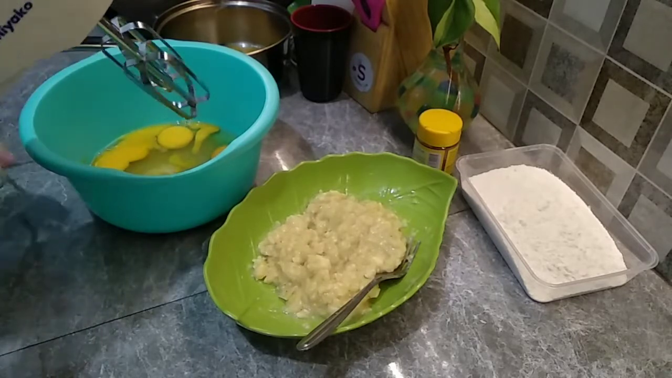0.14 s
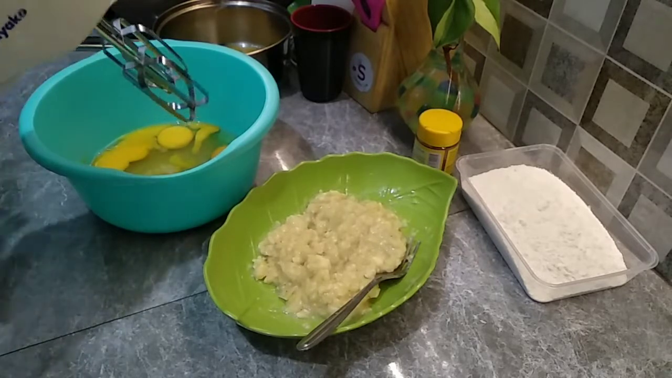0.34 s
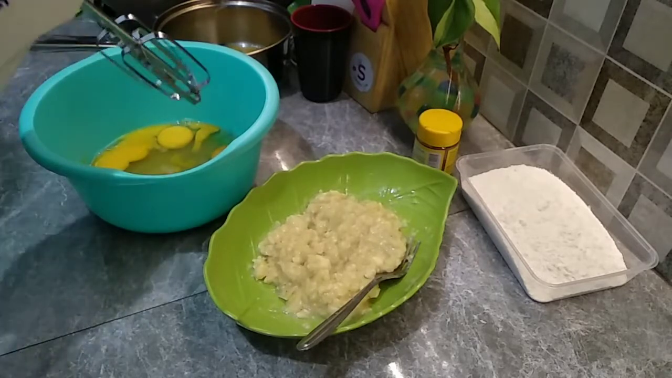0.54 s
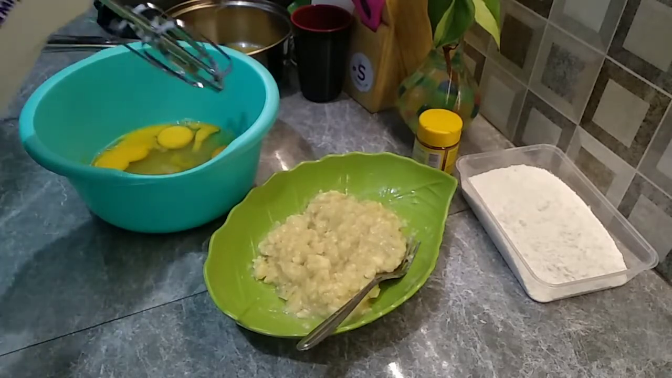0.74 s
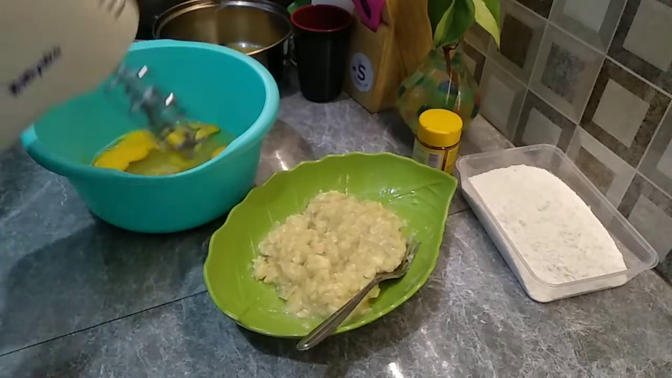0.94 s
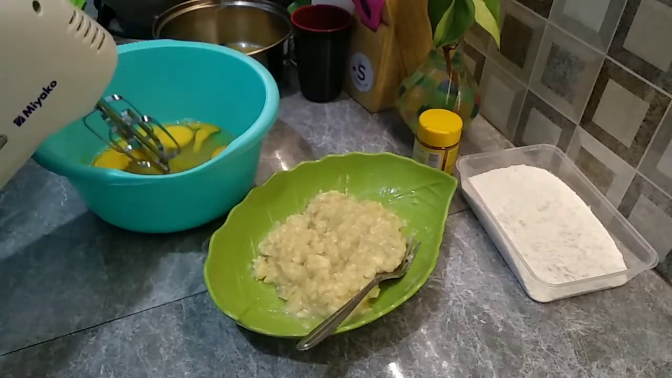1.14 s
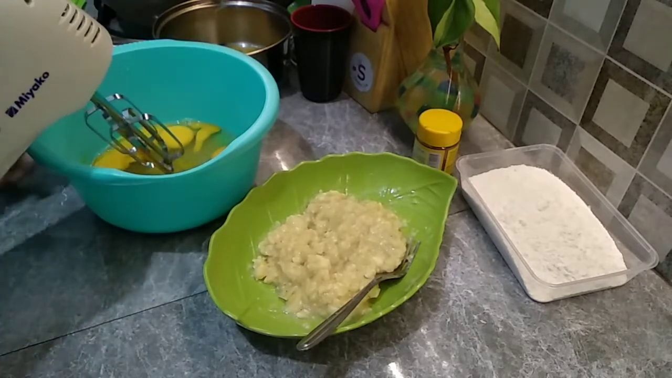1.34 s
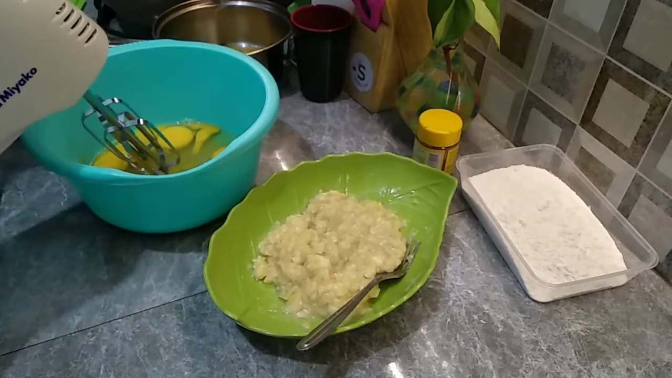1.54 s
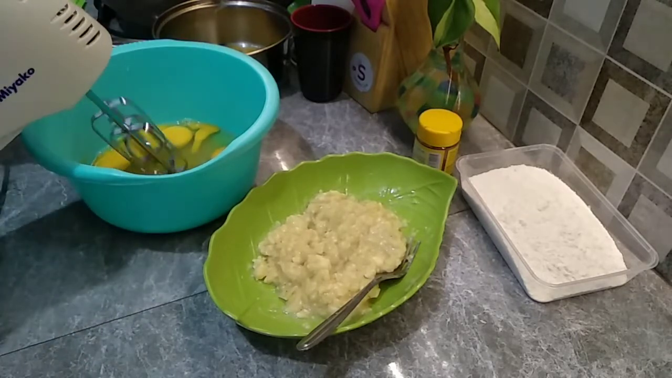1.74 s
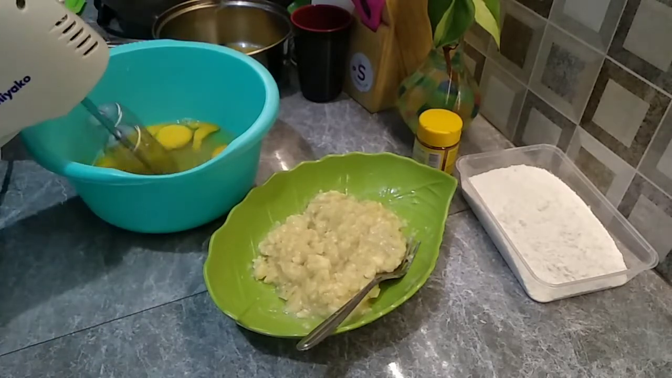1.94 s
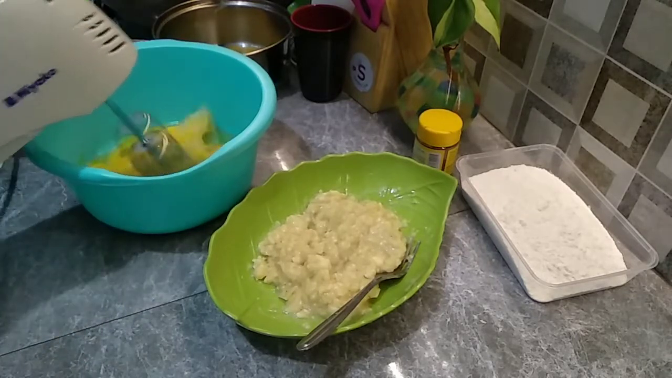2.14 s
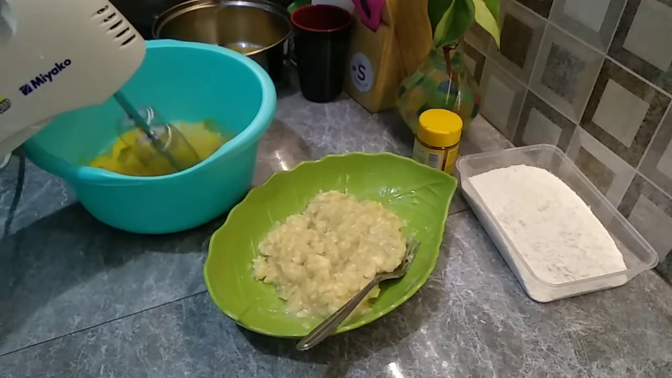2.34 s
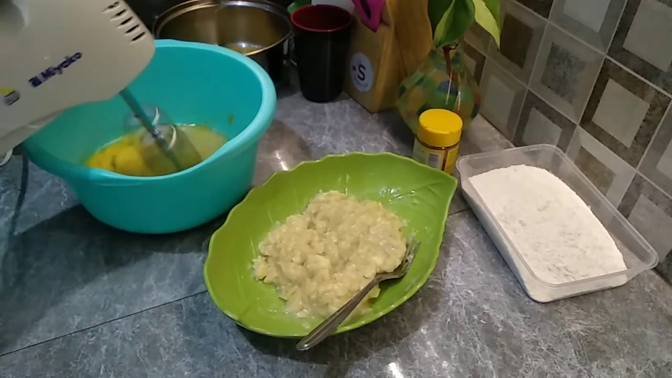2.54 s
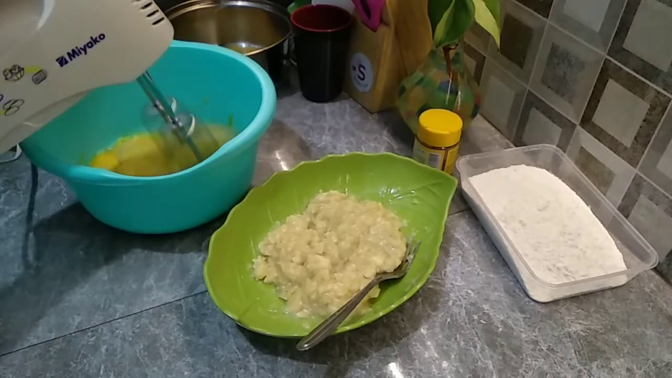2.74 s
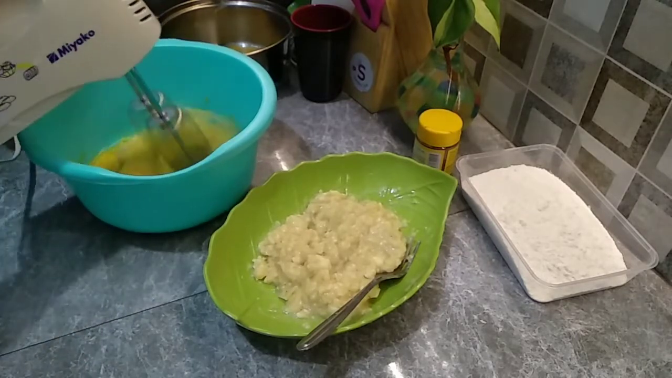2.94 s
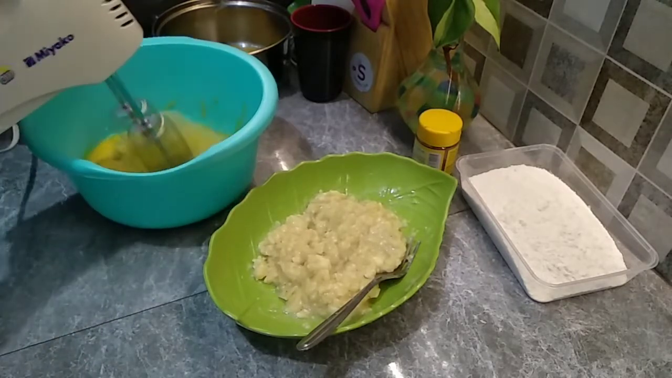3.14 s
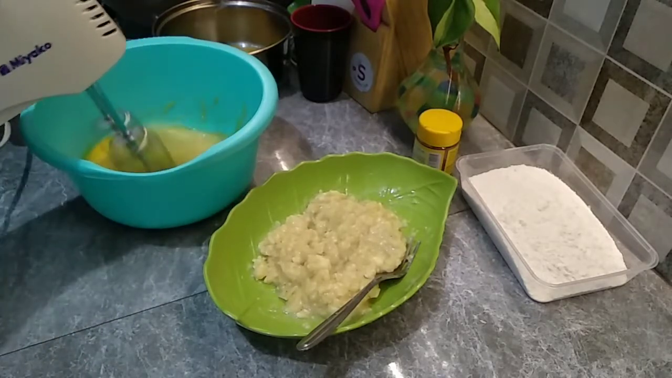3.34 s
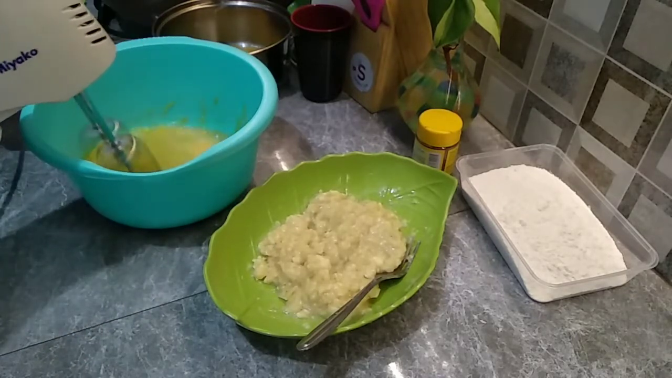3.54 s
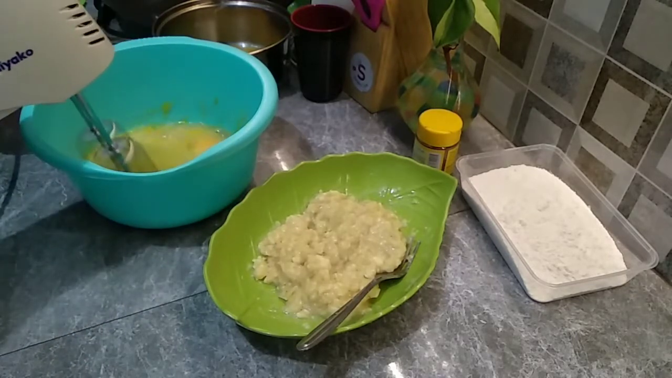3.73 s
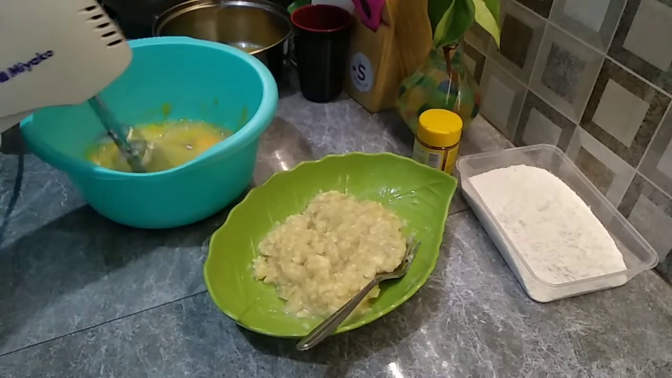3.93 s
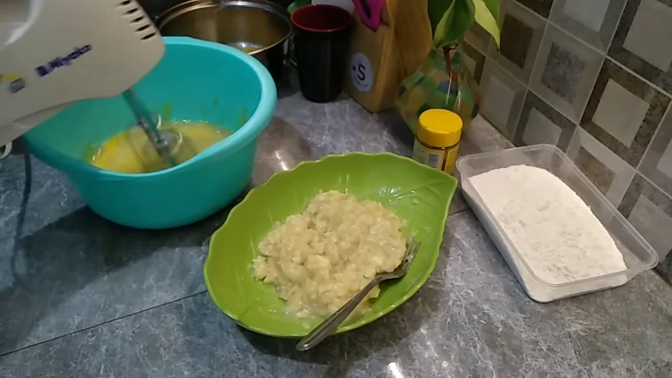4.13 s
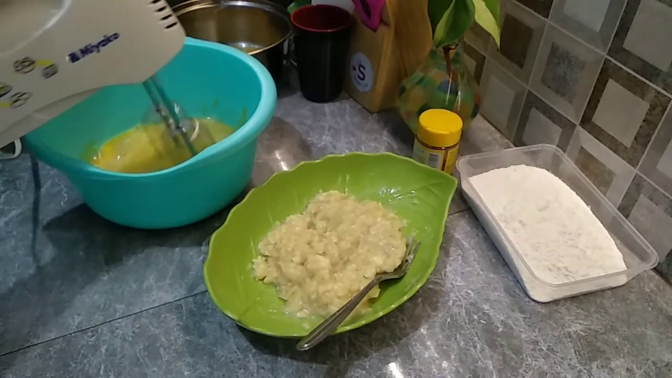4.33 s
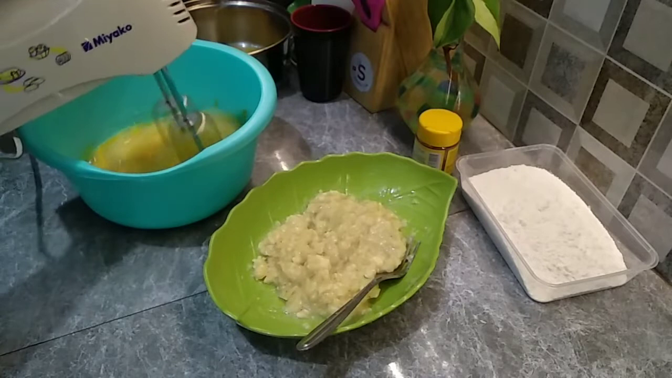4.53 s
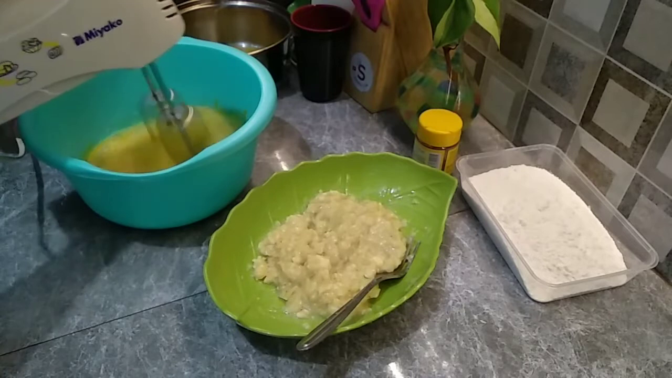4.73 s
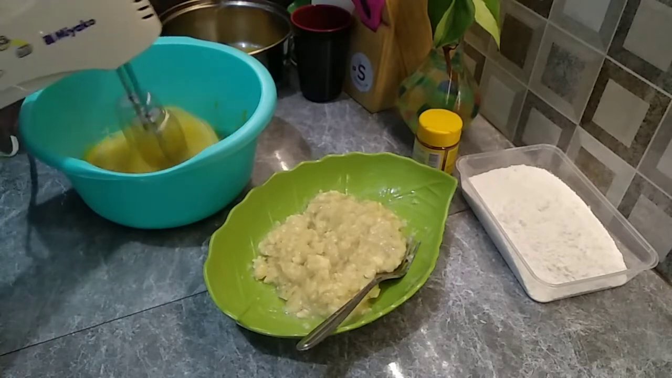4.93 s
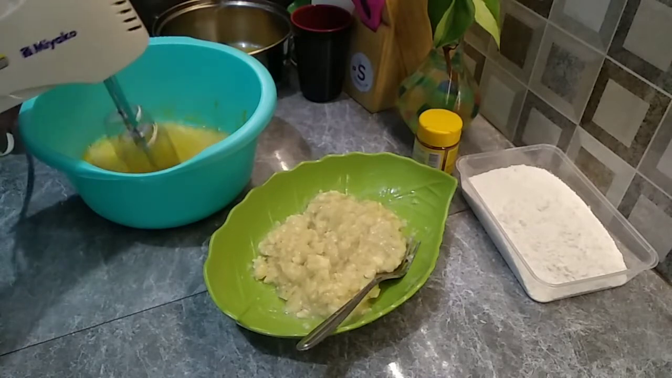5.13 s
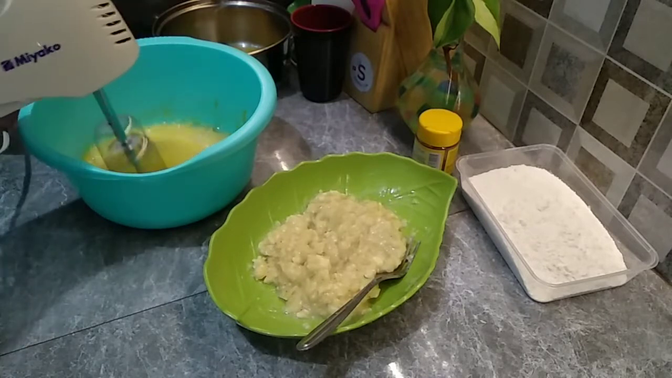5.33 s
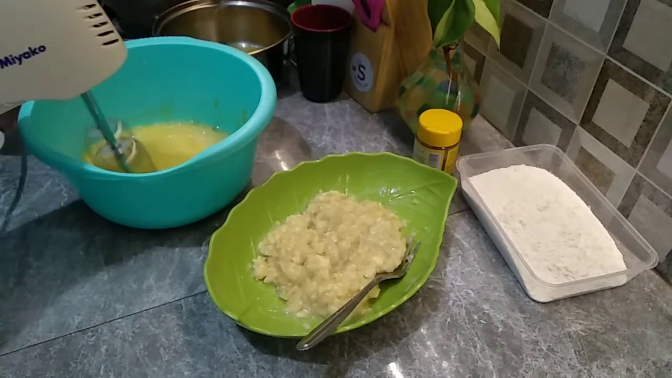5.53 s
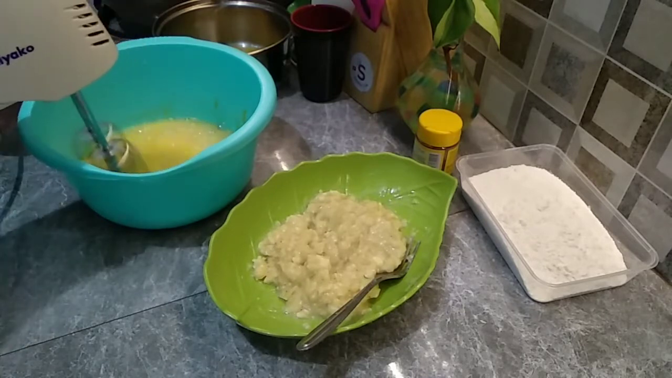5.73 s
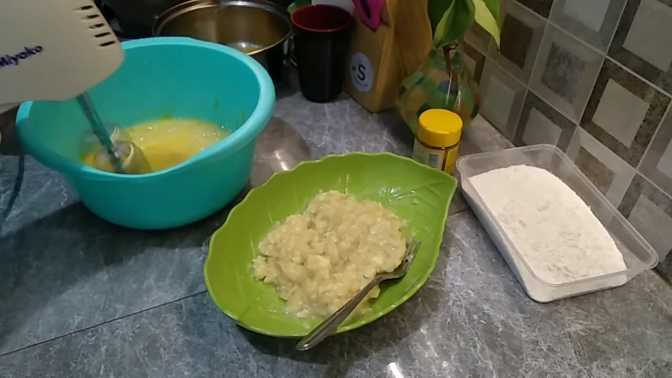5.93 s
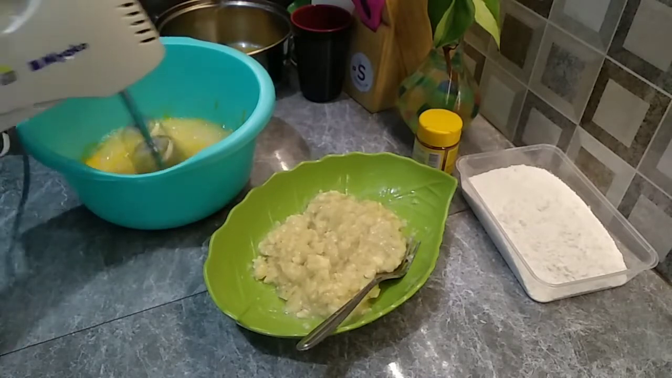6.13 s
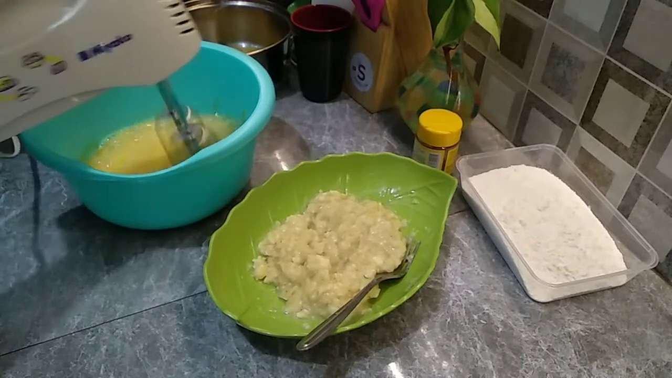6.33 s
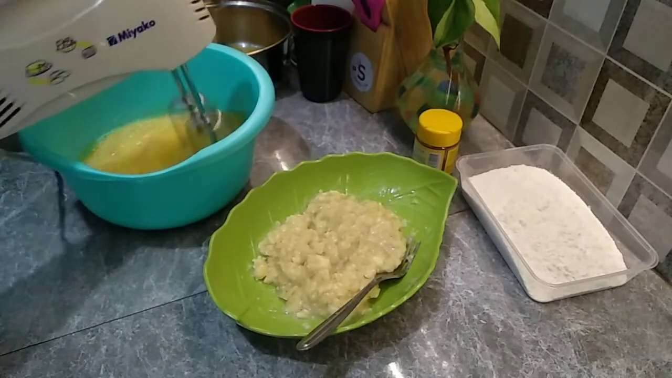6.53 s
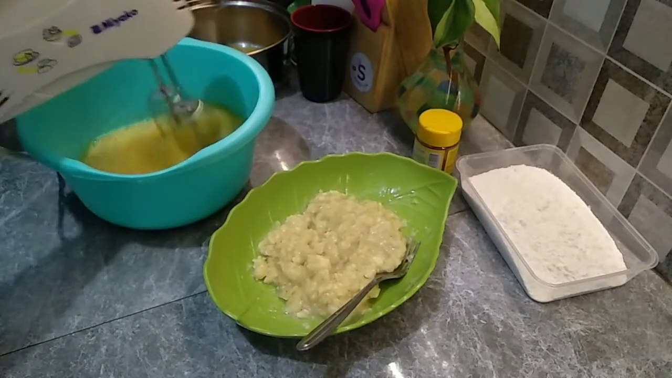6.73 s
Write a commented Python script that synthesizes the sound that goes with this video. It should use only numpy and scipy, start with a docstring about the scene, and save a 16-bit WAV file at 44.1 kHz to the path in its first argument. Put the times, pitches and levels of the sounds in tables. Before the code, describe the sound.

Close in a small tiled kitchen, faint rustles and light clicks come first over a dull background drone. A loud click switches on a hand mixer, which accelerates into a bright, gritty motor whir with shifting whines. Wire beaters clatter against a plastic bowl and splash eggs that soon thin to froth. Scattered hollow knocks follow, and finally a low pulsing hum as the beaters press the bowl; the mixer sound drifts to the right.

```python
"""An electric hand mixer, switched on after a few soft handling clicks, whisks eggs in a plastic bowl.
Its rotor hums and whines as it gains speed: sines locked to the turns, while gears and brushes rasp as
modulated noise. The wire beaters slosh coloured noise, raise rising plops and ring the bowl's modes.
Behind it a low fluttering noise drone with faint mains tones fills the tiled kitchen."""
import sys
import numpy as np
from scipy import signal
from scipy.fft import rfft, irfft, next_fast_len
from scipy.io import wavfile
from scipy.ndimage import uniform_filter1d, map_coordinates

SR = 44100
rng = np.random.default_rng(int(sys.argv[2]) if len(sys.argv) > 2 else 0)


def store_wav(level_fs):
    """Save 16-bit WAV to argv[1]."""
    pcm = np.round(np.clip(np.atleast_2d(level_fs), -1, 1) * 32767)
    wavfile.write(sys.argv[1], SR, pcm.T.astype(np.int16))


N = 303849
T = np.arange(N) / SR  # time (s)


def amp(db):
    """The decibel law: level to amplitude gain."""
    return 10 ** (np.asarray(db) / 20)


def unit(x):
    """Normalisation to an rms of 1."""
    return x / np.sqrt(np.mean(x ** 2) + 1e-20)


def along(points, hz):
    """Interpolation of (hz, value) points on a logarithmic frequency axis."""
    f, v = np.transpose(points)
    return np.interp(np.log(hz + 1), np.log(f + 1), v)


def curves(rows):
    """Linear interpolation in time: one curve for each column after the time."""
    s, *columns = np.transpose(rows)
    return [np.interp(T, s, column) for column in columns]


def ramp(start, length):
    """A linear rise from 0 to 1 over length seconds."""
    return np.clip((T - start) / length, 0, 1)


def wobble(rate):
    """Band-limited random modulation: a smooth curve through rate random knots a second."""
    coarse = T[::12]
    knots = rng.standard_normal(int(N * rate / SR) + 4)
    return np.interp(T, coarse, map_coordinates(knots, [coarse * rate]))


def filtered(x, response):
    """Linear filtering: the spectrum of x times a response of frequency."""
    m = next_fast_len(N + 8192)
    return irfft(rfft(x, m) * response(np.fft.rfftfreq(m, 1 / SR)), m)[..., :N]


def white():
    """Two uncorrelated white noises."""
    return rng.standard_normal((2, N))


def noise(patchy_db):
    """Two noises whose narrow resonances come and go while the level of each wider band holds."""
    z = signal.stft(white(), nperseg=1024)[2]
    field = rng.standard_normal(z.shape[1:])
    field = uniform_filter1d(field, size=3, axis=0)  # across frequency
    field = uniform_filter1d(field, size=16, axis=1)  # across time
    gain = amp(patchy_db * unit(field))
    band_power = uniform_filter1d(gain ** 2, size=11, axis=0)
    gain = gain / np.sqrt(np.abs(band_power) + 1e-12)
    return signal.istft(z * gain, nperseg=1024)[1][:, :N]


# left-right correlation of the sound field: hz, likeness (-1 to 1)
ALIKE = [(30, .35), (150, 0.52), (300, 0.96), (1000, 0.96), (3500, .97), (4300, 0.93), (5000, 0.46),
         (8000, 0.33), (14000, 0.14)]


def radiate(pair, spectrum):
    """Partial coherence: colours two excitations, near mono in the middle range, diffuse in the treble."""
    def mid_side_response(hz):
        turn = np.arccos(np.clip(along(ALIKE, hz), -1, 1)) / 2
        return amp(along(spectrum, hz)) * [np.cos(turn), np.sin(turn)]

    mid, side = filtered(pair, mid_side_response)
    return np.array([mid + side, mid - side]) / np.std(mid)


def swell(s, rise, fall):
    """Contact envelope: a soft build-up to a rounded peak at time s, then decay."""
    rising = ((T - s) / rise) ** 2
    dying = np.sqrt(1 + ((T - s) / fall) ** 2) - 1
    return np.exp(-np.minimum(np.where(T < s, rising, dying), 20))


def tone(turns, order, rough, rate):
    """Phase modulation: a sine with order cycles a turn, blurred by a wandering phase."""
    return np.sqrt(2) * np.sin(2 * np.pi * order * turns + rough * wobble(rate))


# how much of a pan each frequency receives: hz, share
SHADOW = [(300, 0.42), (3000, 0.46), (5000, 0.38), (9000, 0.76)]


def lean(x, pan_db):
    """Interaural level difference: shifts the sound to one side, most in the treble."""
    gains = amp(np.outer([.5, -.5], pan_db))
    return x + filtered(x * (gains / gains.mean(axis=0) - 1), lambda hz: along(SHADOW, hz))


# level of the drone before its flutter: time_s, level_db
DRONE_LEVEL = [(.2, -61), (.35, -63.5), (.76, -60), (.86, -62), (1.18, -65), (1.42, -58.5), (1.6, -62.5)]
# spectra of the drone, of rustle and of bright hiss or edges: hz, relative density_db per Hz
DRONE = [(25, -55), (125, -15.5), (190, -39), (250, -10), (300, -2.5), (345, -0.5), (398, 8), (470, -5.5),
         (630, -12.5), (900, -10.5), (2000, -49)]
RUSTLE = [(300, -25), (550, -8), (1100, 0.5), (2000, -6), (5000, -19), (10000, -36)]
EDGE = [(1500, -23), (3000, -7), (8500, 1.5), (12000, -1.5), (14500, -5.5), (15800, -22)]
# faint mains hum: pitch_hz, level_db
MAINS = [(300, -71), (400, -72.5), (700, -74.5)]
RUSTLE_DB, HISS_DB = -72.5, -79  # steady background; the rustle wavers around its level


def kitchen():
    """Stationary background: a low fluttering noise drone, mains harmonics, uneven rustle and hiss."""
    drone_db, = curves(DRONE_LEVEL)
    drone = amp(drone_db + 2.4 * wobble(30)) * radiate(noise(patchy_db=2.0), DRONE)
    rustle_gain = amp(RUSTLE_DB + 2 * wobble(14) + 2 * wobble(90))
    rustle = rustle_gain * radiate(noise(patchy_db=4.0), RUSTLE)
    hum = sum(amp(db) * tone(T, hz, rough=0.58, rate=7.8) for hz, db in MAINS)
    return drone + hum + rustle + amp(HISS_DB) * radiate(white(), EDGE)


# spectrum of the plastic bowl and housing when struck: hz, relative density_db per Hz
BOWL = [(100, -60), (220, -13), (320, 5), (480, -9), (660, 7), (950, -2.5), (1250, 4.5), (1550, 2),
        (1900, 3), (2400, -1), (2900, 1.5), (5000, -8), (10000, -28)]
ROOM_DECAY_S = 0.072  # decay constant of the tiles' ring


def contacts(rows, rise, fall, tail_db):
    """Impact and reverberation: a short plastic rattle with a bright edge; the tiles ring on after it."""
    shapes = [swell(s, rise, fall) + amp(tail_db) * swell(s, rise, ROOM_DECAY_S) for s, _, _ in rows]
    body = sum(amp(row[1]) * shape for row, shape in zip(rows, shapes))
    edge = sum(amp(row[2]) * shape for row, shape in zip(rows, shapes))
    rattle = amp(1.5 * wobble(700) + 1.3 * wobble(150))
    plastic = noise(patchy_db=2.5) * rattle
    return body * radiate(plastic, BOWL) + edge * radiate(white() * rattle, EDGE)


# handling clicks, the last one the switch: peak_s, body_db, edge_db
CLICKS = [(.532, -55, -62), (.634, -54.5, -50.5), (.81, -52.5, -54), (.903, -72, -69), (1.375, -78, -51.5),
          (1.821, -43, -35)]
# the hand shifts its grip: peak_s, length_s (rise and fall each), rustle_db
SHIFTS = [(0.167, 0.19, -72.5), (0.78, 0.085, -66.5), (1.45, 0.056, -70.5), (1.593, 0.052, -65.5)]
# the housing bumps softly in the hand: peak_s, hollow ring_db, low thump_db
BUMPS = [(.12, -52, -98), (.245, -49.5, -95), (.53, -57, -79), (.685, -51.5, -69), (.728, -55, -70),
         (.775, -53, -66), (1.105, -57, -79), (1.368, -54, -82), (1.52, -56, -76)]
# spectrum of the low thump: hz, relative density_db per Hz
AIR = [(60, -17), (120, 14), (220, -12), (400, -7), (900, -50)]
BUMP_HZ = 375  # hollow ring of the housing


def handling():
    """Friction and impact: the housing rustles, bumps softly and clicks in the hand, up to the switch."""
    rustle = sum(amp(db) * swell(s, length, length) for s, length, db in SHIFTS)
    ring, thump = np.zeros(N), np.zeros(N)
    for s, ring_db, thump_db in BUMPS:
        shape = swell(s, rise=0.015, fall=0.0061)
        ring += amp(ring_db) * shape
        thump += amp(thump_db) * shape
    grip = rustle * radiate(noise(patchy_db=13.0), RUSTLE)
    grip += ring * tone(T, BUMP_HZ, rough=0.75, rate=80)
    grip += thump * radiate(white(), AIR)
    return grip + contacts(CLICKS, rise=0.008, fall=0.0056, tail_db=-17)


# beaters graze the bowl: peak_s, ring_db, excited region centre_hz, rattle_db, wire scrape_db
GRAZES = [(1.846, -31.5, 1100, -37.5, -36.5), (2.12, -39, 1180, -44.5, -51), (2.162, -39.5, 1200, -58, -60),
          (2.252, -42, 1320, -46, -57), (2.294, -34.5, 1200, -45, -55), (2.374, -36.5, 1640, -40, -51),
          (2.524, -44, 1200, -40, -36), (4.04, -33, 1131, -47, -48), (4.067, -36, 2800, -41, -40.5),
          (4.171, -34.5, 1070, -50, -39), (4.379, -30, 1053, -36, -57), (4.398, -33, 2400, -49, -57),
          (5.825, -38, 2600, -36.5, -45), (5.856, -36, 2900, -36.5, -39), (5.882, -32, 1200, -32, -51),
          (5.947, -35.5, 1790, -38.5, -57), (6.405, -31, 690, -39, -46), (6.419, -38.5, 2360, -45, -48),
          (6.535, -28.5, 1420, -36, -40), (6.763, -30, 1870, -36.5, -32)]
# the bowl's modes: pitch_hz, relative level_db
BOWL_MODES = [(345, -3), (670, 15.5), (1180, -2.5), (1325, 2.5), (1540, -10), (1790, -3.5), (2060, -4),
              (2690, -6), (2860, -1)]
CONTACT_OCTAVES = 0.41  # spread of the pitches that one contact excites
MODE_SCATTER = 0.021  # relative detuning by the liquid from graze to graze


def bowl_ring():
    """Modal excitation: each graze briefly rings detuned modes; where the wire lands decides which speak."""
    hz, mode_db = np.transpose(BOWL_MODES)
    ring = np.zeros(N)
    for s, db, centre_hz, _, _ in GRAZES:
        near = np.abs(T - s) < .1
        weights = amp(mode_db) * np.exp(-(np.log2(hz / centre_hz) / CONTACT_OCTAVES) ** 2)
        weights /= np.linalg.norm(weights)
        detune, phase = rng.standard_normal((2, len(hz), 1))
        drift = np.cumsum(rng.normal(0, .05, (len(hz), near.sum())), axis=1)
        mode_hz = hz[:, None] * (1 + MODE_SCATTER * detune)
        modes = np.sqrt(2) * np.sin(2 * np.pi * (mode_hz * (T[near] - s) + phase) + drift)
        ring[near] += amp(db) * swell(s, rise=0.0075, fall=0.0075)[near] * (weights @ modes)
    return ring


# spectrum of the sloshing egg: hz, relative density_db per Hz
LIQUID = [(120, -36), (210, -7), (290, -1.5), (390, 14.5), (490, -11.5), (650, 8), (790, -4), (920, -5.5),
          (1300, -30)]
# hollow plops as the beaters tear the eggs: peak_s, pitch_hz at the peak, level_db
PLOPS = [(1.91, 1370, -41), (2.05, 1380, -45), (2.11, 330, -49), (2.281, 900, -46.5), (2.53, 286, -45.5),
         (2.55, 1110, -42.5), (2.59, 648, -44), (4.249, 772, -38.5), (5.947, 640, -40)]
PLOP_RISE_PER_S = 2.1  # relative rise of a plop's pitch
BLENDED_S, BLEND_TAKES_S = 3.07, 0.16  # the full slosh starts to fade, and its fade length
WHOLE_DB, BLENDED_DB = -58, -47.5  # full slosh, and the froth before its low cut
FROTH_LOW_HZ = 576  # the froth layer lacks the deep slosh


def eggs():
    """Splash noise and bubble resonance: uneven slaps lose their depth as eggs blend; air pockets plop."""
    whole = 1 - ramp(BLENDED_S, BLEND_TAKES_S)
    slap_gain = amp(3 * wobble(45) + 1 * wobble(12))
    slaps = radiate(noise(patchy_db=5.0) * slap_gain, LIQUID)
    froth = amp(BLENDED_DB) * filtered(slaps, lambda hz: hz ** 4 / (hz ** 4 + FROTH_LOW_HZ ** 4))
    plops = np.zeros(N)
    for s, hz, db in PLOPS:
        rising = T + PLOP_RISE_PER_S * (T - s) ** 2 / 2  # warped time raises the pitch
        plops += amp(db) * swell(s, rise=0.021, fall=0.0087) * tone(rising, hz, rough=0.52, rate=96)
    return amp(WHOLE_DB) * whole * slaps + froth + plops


# the beaters lean on the bowl: time_s, pressure (0-1)
PRESSURE = [(5.82, 0), (5.86, 0.37), (5.99, 0.68), (6.15, 0.77), (6.35, 0.8), (6.49, 0.7), (6.54, 0.95),
            (6.58, 0.67), (6.615, 0), (6.66, 0.53), (6.72, 0.4), (6.77, 0.85), (6.805, 0.1), (6.85, 0.52),
            (6.89, 0.1)]


def pressure():
    """Contact force: how hard the beaters lean on the bowl, 0-1."""
    return np.clip(curves(PRESSURE)[0], 0, 1)


# spectrum of the pressed bowl: hz, relative density_db per Hz
BOOM = [(200, -30), (325, 1.5), (490, -35), (670, -5), (850, -26), (1500, -44)]
PRESSED_RUB_DB = -43.5  # at full pressure


def boom():
    """Friction noise: beaters leaning on the bowl rub it, and its low resonances murmur around the hum."""
    return amp(PRESSED_RUB_DB) * pressure() * radiate(white(), BOOM)


# resonances of the mixer's plastic shell: centre_hz, width_hz, relative level_db
SHELL = [(1199, 53, 2), (1343, 43, 0), (1600, 156, -4.5), (1900, 58, -11), (2010, 39, -4.5), (2113, 26, 0),
         (2240, 42, -2.5), (2514, 43, -2.5), (2676, 43, 2.5), (2872, 32, 0.5), (3026, 28, -2.5),
         (3154, 96, -3), (3480, 43, -5.5), (3790, 30, -6), (4090, 130, -6.5)]


def shell(hz):
    """Resonance: the power sum of the shell's overlapping modes, as a gain."""
    power = sum(amp(db) ** 2 / (1 + (2 * (hz - centre) / width) ** 2) for centre, width, db in SHELL)
    return np.sqrt(power)


# bursts of rasp before fixed trims: time_s, gear level_db, brush level_db
RASP = [(2.0, -47.5, -44.5), (2.15, -44, -41), (2.27, -43, -40), (3.07, -39.5, -36.5), (3.59, -40.5, -36),
        (4.59, -38.5, -39), (5.12, -40, -40), (5.73, -41, -38.5), (6.36, -41, -38), (6.44, -40.5, -38),
        (6.69, -37.5, -37), (6.85, -38, -38.5)]
# spectra of gears and brushes: hz, relative density_db per Hz
GEARS = [(170, -25), (400, -30), (950, -3), (1150, -1), (4200, 2.5), (6000, 9)]
BRUSHES = [(2500, -15), (4000, -9), (6100, -4.5), (6450, -9.5), (7100, -1), (7400, -11.5), (8000, -3.5),
           (8700, 1), (9500, -2), (11200, -6.5), (12200, -3), (12800, -7.5), (15800, -9.5)]
WIRE_PASSES_PER_TURN = 1 / 12
WIRE_BEAT_DB = -0.5  # each pass of a wire loads the gears


def rasp(turns):
    """Amplitude-modulated noise: brushes hiss with the rotor; gears chatter unevenly in the shell."""
    gear_db, brush_db = curves(RASP)
    each_turn = np.cos(2 * np.pi * turns)
    grit = wobble(900)
    wire_beat = WIRE_BEAT_DB * np.cos(2 * np.pi * WIRE_PASSES_PER_TURN * turns + wobble(8))
    chatter = amp(wire_beat + 1.4 * grit + 1.0 * wobble(200) + .9 * wobble(36))
    teeth = noise(patchy_db=5.5)
    gears = radiate(filtered(teeth * chatter, shell), GEARS)
    sparks = amp(0.2 * each_turn + 1 * grit + 0.69 * wobble(70) + 0.88 * wobble(12))
    brushes = radiate(noise(patchy_db=5.5) * sparks, BRUSHES)
    return amp(gear_db - 0.42) * gears + amp(brush_db + 1.98) * brushes


FLICK_LIFE_S = .012  # each flick draws its decay from 0.5 to 1.5 times this


def clatter(per_second, db):
    """Random impacts: the wires flick bowl and liquid; each flick is a decaying sine of its own pitch."""
    gear_db, _ = curves(RASP)  # the flicks follow the gears' level
    draws = rng.random((int(per_second * N / SR), 4))
    start, pitch, strength, life = (draws[:, k:k + 1] for k in range(4))
    t = np.arange(SR // 24) / SR
    hz = 1130 * 2.8 ** pitch
    decay = np.exp(-t / (FLICK_LIFE_S * (.5 + life)))
    flicks = amp(12.3 * strength) * np.sin(2 * np.pi * hz * t) * decay
    at = (start * N).astype(int) + np.arange(len(t))
    train = np.bincount(at.ravel(), flicks.ravel(), N)[:N]
    return amp(gear_db + db) * unit(train)


ECHO_S, ECHO_SWING, ECHO_GAIN = .0017, .07, .36  # delay (s) of the first wall, relative swing, gain


def bowl_echo(x):
    """Comb filtering: two bowl walls reflect the sound; paths shift as the hand circles, and so its colour."""
    out = x.copy()
    for wall in range(1, 3):
        late = SR * wall * ECHO_S * (1 + ECHO_SWING * wobble(2.4))  # samples
        out += ECHO_GAIN * np.array([map_coordinates(side, [np.arange(N) - late]) for side in x])
    return out / np.sqrt(1 + 2 * ECHO_GAIN ** 2)


# rotor speed before its slight jitter: time_s, speed_hz (turns per second)
SPEED = [(1.8, 120), (1.9, 200), (2.2, 255), (2.53, 288), (2.65, 298), (2.9, 313), (3.18, 322), (3.5, 330),
         (3.85, 334), (4.5, 337), (5.3, 336.5), (5.73, 339.6), (6.1, 342.5), (6.89, 343)]
# the two poles hum twice a turn: time_s, level_db before a fixed trim and stutter
POLE_HUM = [(1.9, -66), (2.8, -61), (2.94, -50.5), (3.3, -48), (3.6, -41), (3.78, -40), (3.86, -46),
            (4.53, -43.5), (4.78, -56), (4.94, -56), (5.02, -45), (5.3, -42), (5.48, -50), (5.62, -44.5),
            (6.0, -51), (6.2, -46), (6.5, -46), (6.6, -58)]
# whines flare up and fade: peak_s, half_length_s, multiple of the rotor speed, relative level_db
WHINES = [(2.8, .08, 4, -44), (3.32, .05, 4, -44), (4.5, .13, 4, -46), (3.47, .15, 5, -48),
          (3.88, .13, 8, -47), (6.43, .08, 8, -46), (4.48, .22, 9, -48), (5.31, .12, 9, -48),
          (3.13, .13, 12, -49), (6.23, .1, 12, -43.5), (6.46, .09, 12, -43.5), (2.66, .06, 24, -45),
          (3.53, .12, 24, -43.5), (4.78, .08, 36, -47), (5.41, .12, 36, -46), (6.08, .12, 36, -43.5),
          (6.54, .1, 36, -46)]
WHINE_DB = 1.4  # added to all the whines
FREE_HUM_DB, PRESSED_HUM_DB = -62, -38  # at top speed; at full pressure, before judder
UNBALANCE_POWER = 12  # the free hum grows as this power of the speed


def motor(turns):
    """Rotor harmonics: unbalance hums once a turn, the poles twice; higher orders whine as the load shifts."""
    pole_db, = curves(POLE_HUM)
    speed_hz, = curves(SPEED)
    free = amp(FREE_HUM_DB) * (speed_hz / speed_hz.max()) ** UNBALANCE_POWER
    judder = amp(1.2 * wobble(60))
    pressed = amp(PRESSED_HUM_DB) * pressure() * judder
    hum = (free + pressed) * tone(turns, order=1, rough=0.22, rate=90)
    stutter = np.abs(1 + .38 * wobble(34))
    hum += amp(pole_db - 3.0) * stutter * tone(turns, order=2, rough=.45, rate=75)
    for multiple in sorted({row[2] for row in WHINES}):
        flares = np.zeros(N)
        for s, half, k, db in WHINES:
            if k == multiple:
                flares += amp(db) * np.exp(-np.minimum(((T - s) / half) ** 2, 20))
        flutter = amp(2.5 * wobble(70))
        whine = tone(turns, multiple, rough=0.19 + 0.02 * multiple, rate=260)
        hum += amp(WHINE_DB) * flares * flutter * whine
    return hum


ON = 1.803  # switch-on (s)
KITCHEN_PAN_DB = -12  # left minus right
# the mixer's sound swings right, then drifts back
TURN_S, TURN_TAKES_S, TURNED_PAN_DB, RETURN_DB_PER_S = 4.12, 0.72, -11.5, 3


def scene():
    """Superposition: the mixer runs on from the switch and swings right while the bowl stays in the middle."""
    speed_hz, = curves(SPEED)
    turns = np.cumsum(speed_hz * (1 + 0.00148 * wobble(14))) / SR
    mixer = motor(turns) + bowl_echo(rasp(turns)) + eggs() + boom() + clatter(per_second=120, db=-7)
    pan_db = TURNED_PAN_DB * ramp(TURN_S, TURN_TAKES_S)
    pan_db += RETURN_DB_PER_S * np.maximum(T - TURN_S - TURN_TAKES_S, 0)
    scrapes = [(s, rattle_db, scrape_db) for s, _, _, rattle_db, scrape_db in GRAZES]
    bowl = bowl_ring() + contacts(scrapes, rise=0.0094, fall=0.01, tail_db=-20.5)
    running = ramp(ON, 0.021) * (lean(mixer, pan_db) + bowl)
    return running + handling() + lean(kitchen(), KITCHEN_PAN_DB)


LOW_CUT_HZ, TOP_HZ = 45, 15850


def record(dry):
    """Band limitation: the microphone thins out the deepest bass, and a steep edge removes the top."""
    def response(hz):
        bass = hz ** 2 / (hz ** 2 + LOW_CUT_HZ ** 2)
        top = np.clip((TOP_HZ - hz) / 200 + .5, 0, 1)
        return bass * top

    return filtered(dry, response)


dry = scene()
out = record(dry)
store_wav(out)
```